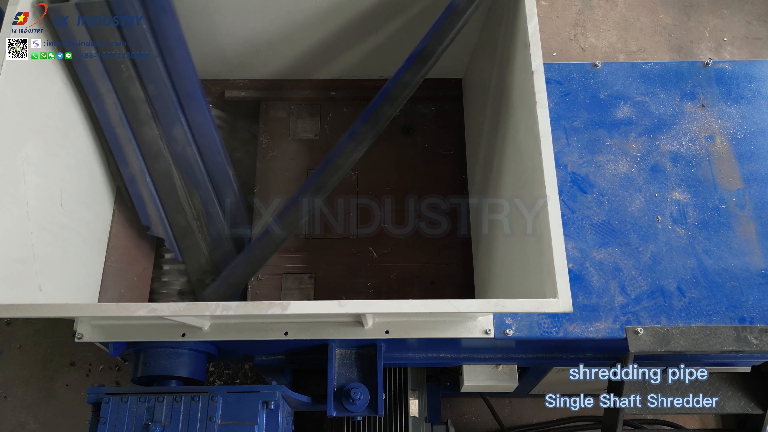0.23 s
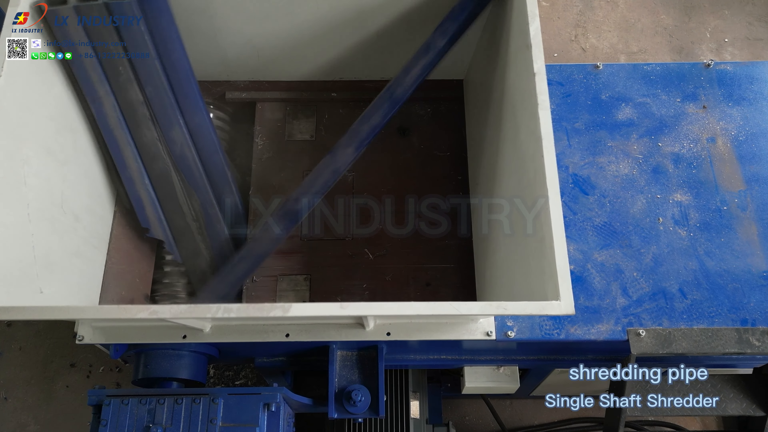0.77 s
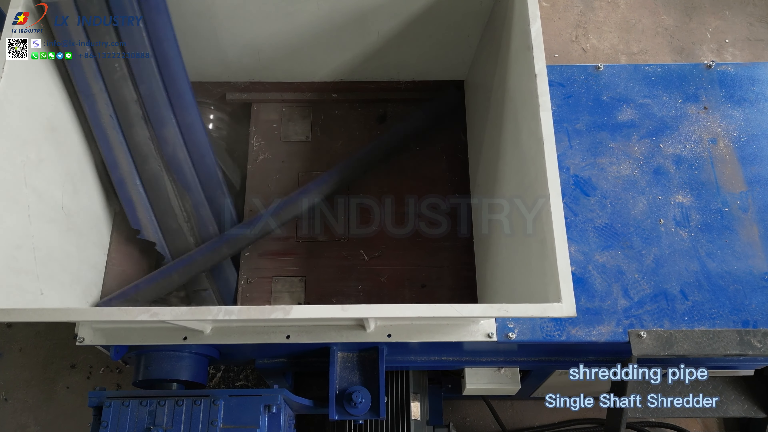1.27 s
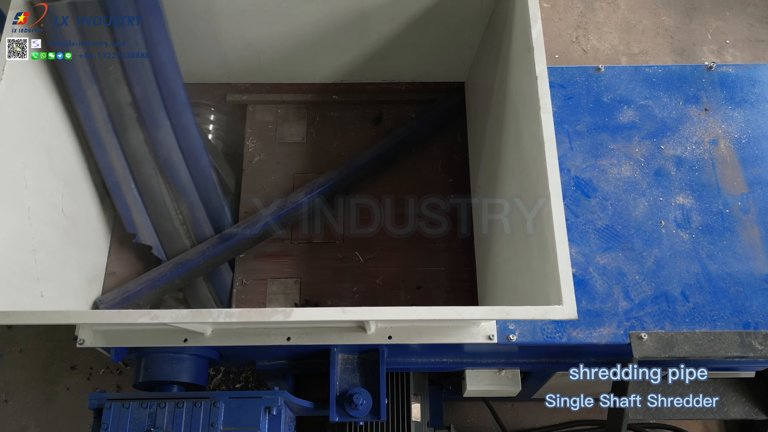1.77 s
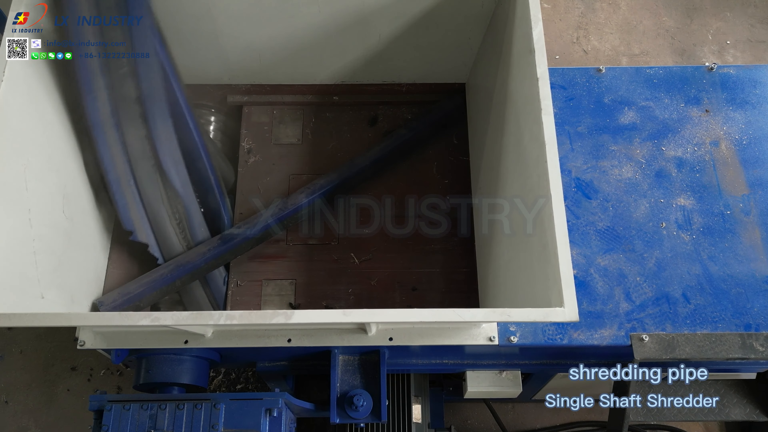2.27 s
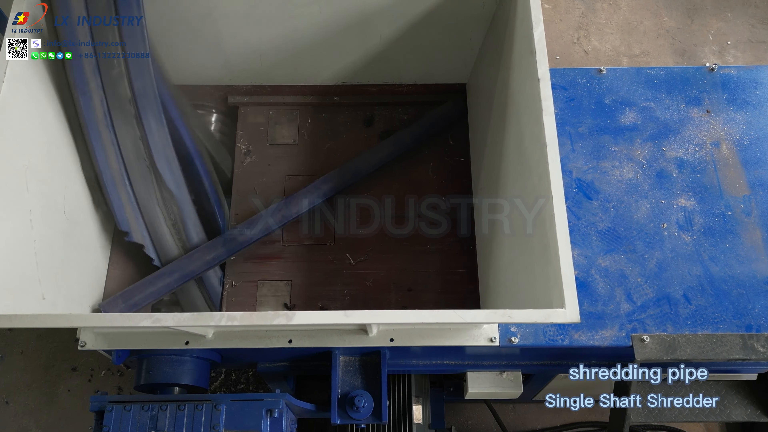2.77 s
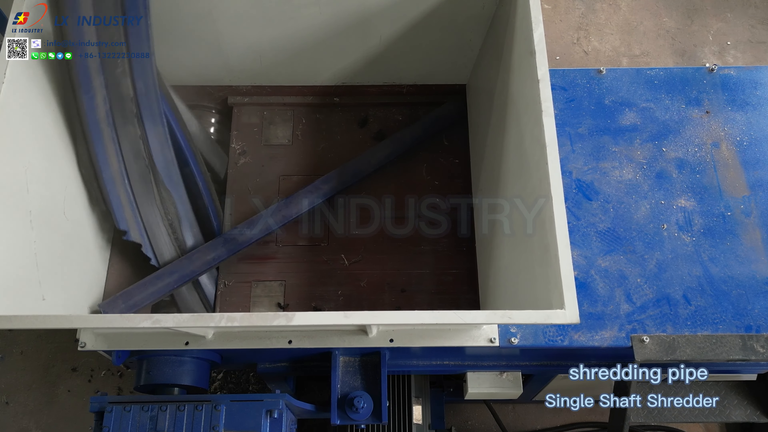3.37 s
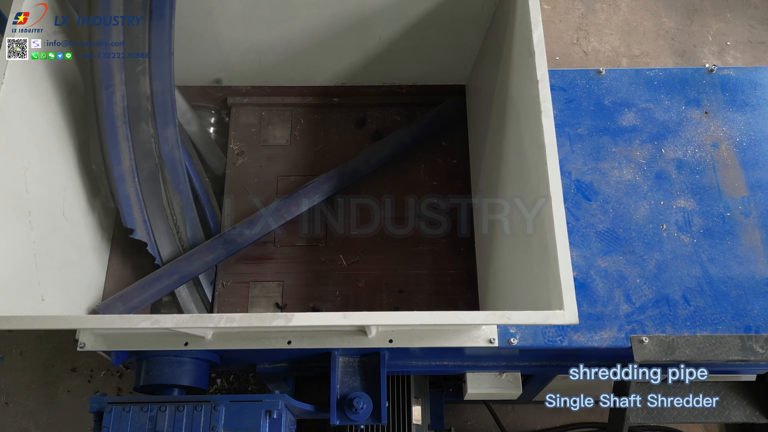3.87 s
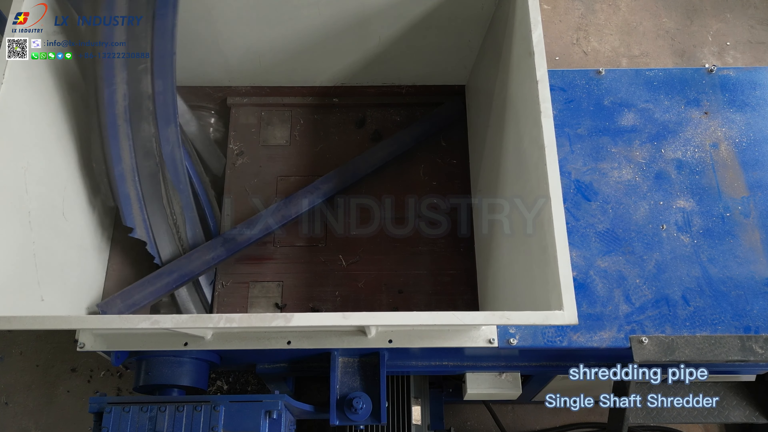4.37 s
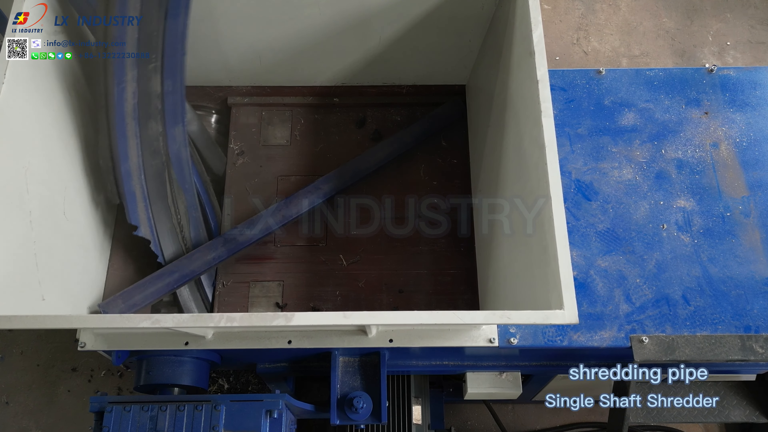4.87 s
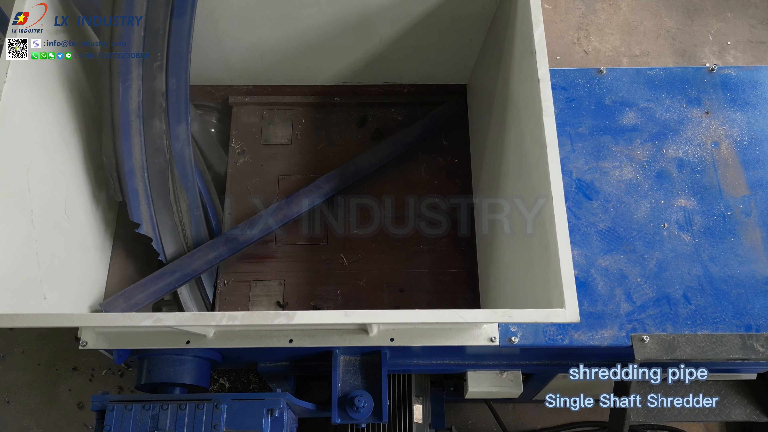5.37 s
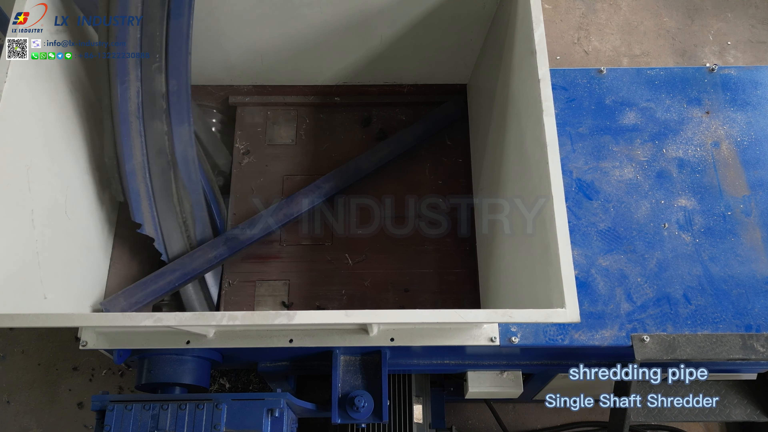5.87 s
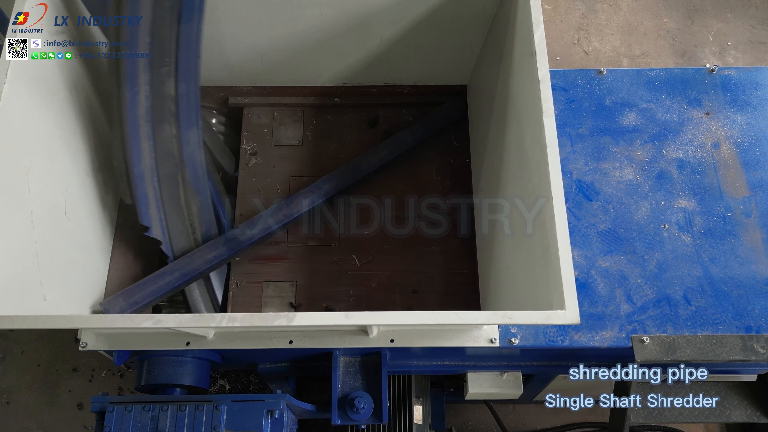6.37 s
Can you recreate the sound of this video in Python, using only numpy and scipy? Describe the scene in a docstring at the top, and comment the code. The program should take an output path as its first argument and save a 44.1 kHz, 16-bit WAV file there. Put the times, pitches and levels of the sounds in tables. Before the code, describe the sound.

Close above a steel hopper, a shredder bites plastic pipe almost six times a second, each bite a low thump with dense crunching, crackle and hollow snaps. The bending pipe groans raggedly, then honks on every bite. Around five seconds the cutting stops, leaving loose pieces knocking and ticking over a low drive hum, with a slight catch at the end.

```python
"""Shredder chewing plastic pipes

A single-shaft shredder in a steel hopper, heard from above. The knives bite almost six times a second:
each bite thumps the frame and crushes plastic, as shaped noise made of random fractures.
The bending pipe groans, then honks on every knife, as wavering sines; snapped lengths ring in bending modes.
Then the rotor runs nearly empty, loose pieces knock over the drive's hum, and the knives catch again."""
import sys
import numpy as np
from scipy import signal
from scipy.fft import rfft, irfft, next_fast_len
from scipy.io import wavfile
from scipy.ndimage import map_coordinates

SR = 44100
rng = np.random.default_rng(int(sys.argv[2]) if len(sys.argv) > 2 else 0)


def to_wav(sig):
    """Store sig (one row per channel, or 1-D mono) as 16-bit WAV at the path in sys.argv[1].

    Samples outside -1..1 are clipped; the rate is SR.
    """
    pcm = np.clip(np.atleast_2d(sig), -1, 1) * 32767
    pcm = np.round(pcm).astype(np.int16)
    wavfile.write(sys.argv[1], SR, pcm.T)  # frames by channels


N = 291501

# Levels in all tables are relative: the functions add trims.
# knives breaking into the pipe wall: (time [s], crunch level [dB], bright crackle level [dB])
BITES = [(.1, -26, -43), (.277, -21, -31), (.455, -21, -30), (.628, -16.5, -26), (.8, -19, -27),
         (.98, -20, -22.5), (1.163, -19.5, -22.5), (1.335, -20.5, -21.5), (1.5, -17, -29),
         (1.66, -18.5, -34), (1.82, -19.5, -31), (2.01, -19.5, -37), (2.2, -20, -27), (2.375, -16.5, -38),
         (2.555, -20, -29), (2.735, -18.5, -29), (2.92, -19, -36), (3.09, -20, -31), (3.254, -22, -32),
         (3.429, -19.5, -27), (3.6, -30, -28), (3.78, -29, -28), (3.955, -29, -31), (4.13, -28, -32),
         (4.305, -22.5, -30), (4.48, -23, -32), (4.665, -24.5, -24.5), (4.835, -21.5, -30)]


def amp(db):
    """Decibels to gain."""
    return 10 ** (np.asarray(db) / 20)


def unit(x):
    """Scale to rms 1."""
    return x / np.sqrt(np.mean(np.abs(x) ** 2) + 1e-20)


def clock():
    """Time of each sample [s]."""
    return np.arange(N) / SR


def along(points, hz):
    """Each column of (frequency [Hz], ...) points, interpolated on a log axis."""
    f, *cols = np.transpose(points)
    return [np.interp(np.log(hz + 1), np.log(f + 1), c) for c in cols]


def level(rows, at_s):
    """A (time [s], level [dB]) curve, read at the given moments."""
    return np.interp(at_s, *np.transpose(rows))


def wobble(rate_hz):
    """Smooth random curve with rate_hz knots a second."""
    knots = rng.standard_normal(int(N * rate_hz / SR) + 4)
    return map_coordinates(knots, [clock() * rate_hz], mode="nearest")


def phase_of(hz):
    """Phase [rad] of a tone that follows a frequency curve."""
    return 2 * np.pi * np.cumsum(hz) / SR


def filtered(x, response):
    """x times a complex response of frequency."""
    size = next_fast_len(N + SR // 4)
    spectrum = rfft(x, size) * response(np.fft.rfftfreq(size, 1 / SR))
    return irfft(spectrum, size)[..., :N]


def causal(gain):
    """Minimum-phase response with this gain: it rings only after its cause."""
    cepstrum = irfft(np.log(np.maximum(gain, 1e-6)))
    half = len(cepstrum) // 2
    return np.exp(rfft(np.r_[cepstrum[0], 2 * cepstrum[1:half]], len(cepstrum)))


def fractures(rate_hz, spread_db):
    """Tiny snaps at random moments, sizes spread by spread_db, in two rows that share the moments but draw
    their signs and sizes apart."""
    sizes = amp(spread_db * np.clip(rng.standard_normal(N), -2, 2))
    snapped = rng.random(N) < rate_hz / SR
    return unit(snapped * sizes * rng.standard_normal((2, N)))


def hopper(excitation, colour, ring_db):
    """Excitation coloured by hopper and pipe resonances and spread in stereo, at rms 1."""
    # hopper and pipe resonances: (centre [Hz], width [Hz], gain over the broad colour [dB])
    resonances = [(110, 8.5, -5), (139.3, 19, -8.5), (236, 31, -8.5), (454, 5.1, -20), (506, 2.8, -2),
                  (666, 180, -8), (910, 51, -9.5), (1063, 12, -7), (2526, 36, -13), (6320, 680, -6)]
    # stereo width, phase and balance by frequency, opposite in phase near 10 kHz:
    # (frequency [Hz], side minus mid [dB], left's lead [rad], left minus right [dB])
    stereo = [(60, -29, 0, 0), (150, -20, 0, 0), (380, -12.5, .1, -.7), (900, -9.5, .35, 1.3),
              (1600, -7, -.3, .7), (2300, -8.5, .15, -.2), (3100, -6.5, 1.2, -.3), (4500, -2, 1.3, 1),
              (5500, -1, 0, 3.5), (7200, -4, -.9, 1.8), (8500, -9, -2.2, .8), (10000, -14, -3.1, 0),
              (11500, -12, -5.3, 0), (12500, -15, -6.1, 0)]

    def body(hz):
        rings = 0
        for c, w, db in resonances:
            rings = rings + amp(db + ring_db) * 1j * hz * w / (c * c - hz * hz + 1j * hz * w)
        turn = np.arctan(amp(along(stereo, hz)[0]))
        split = np.array([np.cos(turn), np.sin(turn)])  # mid, side
        return causal(amp(along(colour, hz)[0])) * (1 + rings) * split

    def left_right(hz):
        _, lead_rad, balance_db = along(stereo, hz)
        left = amp(balance_db / 2) * np.exp(.5j * lead_rad)
        return np.array([left, 1 / left])

    mid, side = filtered(excitation, body)
    return unit(filtered(np.array([mid + side, mid - side]), left_right))


def swells(times_s, peaks_db, rise_s, fall_s):
    """Force envelope: each event builds and fades as a two-sided Gaussian in power; powers add."""
    power = np.zeros(N)
    for s, db in zip(times_s, peaks_db):
        span = slice(max(int((s - 5 * rise_s) * SR), 0), int((s + 5 * fall_s) * SR))
        t = np.arange(*span.indices(N)) / SR - s
        power[span] += amp(db) ** 2 * np.exp(-(t / np.where(t < 0, rise_s, fall_s)) ** 2)
    return np.sqrt(power)


def cutting(ping_db=-4):
    """Each bite shakes the frame, crushes pipe wall and sets off fine crackle; snags jolt more suddenly."""
    # how strongly a bite shakes the frame: (time [s], level [dB])
    thump_curve = [(.1, -20), (1.2, -24.5), (2.05, -13.5), (2.7, -15.5), (3.2, -34), (4.2, -36),
                   (4.83, -24)]
    # stray ends caught after the last regular bite: (time [s], frame thump level [dB], crunch level [dB])
    snag_rows = [(4.9, -40, -25), (4.975, -30, -27), (5.085, -29, -40), (6.505, -35, -32),
                 (6.555, -44, -38)]
    # colours of frame thump, breaking pipe, crackle: (frequency [Hz], gain [dB])
    frame_colour = [(20, -34), (40, -16), (56, 8.5), (78, 13.5), (95, -3), (140, 6.5), (260, -41.5)]
    crunch_colour = [(40, -46), (110, -11), (170, -4), (240, 1), (290, -2), (380, -2), (520, -3),
                     (750, -2.5), (1100, -3), (1900, -9), (2750, -14.5), (3700, -22), (8000, -33),
                     (15000, -45)]
    crackle_colour = [(400, -27), (1000, 2), (1500, 0), (2100, -4.5), (2650, 1.5), (3600, -8.5),
                      (6000, -18), (9000, -30), (15000, -47)]

    bites, crunch_db, crackle_db = np.transpose(BITES)
    snags, jolt_db, tear_db = np.transpose(snag_rows)
    shaking = np.hypot(swells(bites, level(thump_curve, bites) - 8, rise_s=0.087, fall_s=0.059),
                       swells(snags, jolt_db, rise_s=0.03, fall_s=0.045))
    breaking = np.hypot(swells(bites, crunch_db - 1.5, rise_s=0.042, fall_s=0.048),
                        swells(snags, tear_db, rise_s=0.084, fall_s=0.023))
    crackling = swells(bites, crackle_db - 2.5, rise_s=0.036, fall_s=0.037)

    thump = hopper(fractures(rate_hz=900, spread_db=0.0), frame_colour, ring_db=1)
    crushed = amp(1.3 * wobble(70)) * fractures(rate_hz=16000, spread_db=1.5)
    crunch = hopper(crushed, crunch_colour, ring_db=8.0)
    cracked = amp(3.0 * wobble(160)) * fractures(rate_hz=3500, spread_db=4.5)
    crackle = hopper(cracked, crackle_colour, ring_db=-3) + amp(ping_db) * splinters()
    return shaking * thump + breaking * crunch + crackling * crackle


def splinters(rate_hz=260, pitch_hz=1450, octaves=.7, cycles=32, spread_db=2):
    """Splinters spring free and ring, each at its own pitch and place, losing 20 dB in `cycles` cycles."""
    draws = rng.standard_normal((int(rate_hz * N / SR), 3))  # pitch, level, place
    t = np.arange(SR // 20) / SR
    hz = pitch_hz * 2 ** (octaves * np.clip(draws[:, :1], -1.3, 1.6))
    pings = np.sin(2 * np.pi * hz * t) * amp(spread_db * draws[:, 1:2] - 20 * hz * t / cycles)
    at = rng.integers(0, N, (len(draws), 1)) + np.arange(len(t))
    channels = []
    for side in (1, -1):
        panned = pings * amp(side * 2.6 * draws[:, 2:])
        channels.append(np.bincount(at.ravel(), panned.ravel(), N)[:N])
    return unit(np.array(channels))


def snaps(rise_s=0.0039, crack_t60_s=0.059):
    """Pipe wall snaps off or is struck: a crack, then a brief ring in bending modes."""
    # snapped lengths, the shorter the higher: (time [s], pitch [Hz], ring level [dB], crack level [dB])
    snap_rows = [(0.061, 244.5, -11, -20), (0.122, 236.4, -13, -15), (0.268, 382, -12, -14.5),
                 (0.398, 385, -14, -24), (0.436, 237, -13, -30), (0.593, 226, -11, -17),
                 (0.649, 390, -19, -22), (0.734, 407, -15, -26), (0.765, 236, -12, -21),
                 (0.82, 235, -16, -24), (1.158, 222, -12, -19), (1.336, 215, -19, -26),
                 (1.361, 374, -15, -19.5), (1.503, 246, -9, -25), (1.551, 356, -10, -26),
                 (1.738, 377, -13, -17), (1.865, 306, -13, -15), (2.021, 385, -12, -13),
                 (2.217, 222.4, -9.5, -34), (2.556, 221, -10.5, -33), (2.709, 242, -8, -20),
                 (3.104, 244.8, -11.5, -23), (5.08, 387, -25, -45), (5.11, 402, -26, -42),
                 (5.276, 476, -27.5, -36), (5.58, 388, -26, -44), (6.164, 370, -29, -48),
                 (6.463, 378, -20, -36)]
    # bending modes of a length: (multiple of pitch, level [dB], t60 [s])
    modes = [(1.001, 1, 0.11), (1.8, -20, 0.11), (2.95, -8, 0.1), (4.3, -25, 0.037)]
    colour = [(150, -18), (400, -3), (750, 4.5), (1100, -8), (1900, -14), (2800, -18), (4000, -13),
              (9000, -34), (15000, -67)]

    rings, cracks = np.zeros((2, N + SR))
    t = np.arange(SR // 5) / SR
    onset = 1 - np.exp(-t / rise_s)
    for s, hz, ring_db, crack_db in snap_rows:
        span = slice(round(s * SR), round(s * SR) + len(t))
        luck = rng.random((len(modes), 2))  # mode level, start phase
        ring = 0
        for (multiple, db, t60_s), (a, b) in zip(modes, luck):
            decay = amp(db + 3.4 * (a - 0.5) - 60 * t / t60_s)
            ring = ring + decay * np.sin(2 * np.pi * (multiple * hz * t + b))
        rings[span] += amp(ring_db + 0.5) * ring * onset
        cracks[span] += amp(crack_db + 6 - 60 * t / crack_t60_s) * onset
    crack = hopper(fractures(rate_hz=6500, spread_db=5.5), colour, ring_db=-18)
    return rings[:N] + cracks[:N] * crack


def groan(judder_db=-4.5):
    """The bending pipe sticks and slips raggedly on the knives: a wavering tone in a judder."""
    # sliding pitch of the strained pipe: (time [s], pitch [Hz], level [dB])
    slide = [(2.08, 370.4, -27), (2.185, 388.7, -21), (2.25, 347.7, -19.5), (2.3, 391.1, -25),
             (2.39, 345.6, -17.5), (2.455, 403.4, -17.5), (2.494, 372, -35), (2.535, 348.4, -16),
             (2.6, 351.3, -21), (2.63, 394.1, -21), (2.712, 390, -22), (2.75, 345.3, -29),
             (2.793, 381.8, -16.5), (2.83, 348.8, -20), (2.88, 372, -19), (2.92, 346, -23),
             (2.961, 396, -19), (3.0, 383.2, -34), (3.06, 373, -19), (3.16, 355, -23), (3.3, 366, -29)]
    tone_db, rough_db, jitter_hz = -1, 2.8, 8
    scrape = [(150, -39.0), (240, -13), (300, -12), (345, -0.5), (400, 3.5), (450, -10.5), (800, -22),
              (2000, -45)]

    def flutter():
        return amp(rough_db * wobble(110))

    times, hz, db = np.transpose(slide)
    phase = phase_of(np.interp(clock(), times, hz) + jitter_hz * wobble(70))
    tone = unit(flutter() * np.sin(phase) + amp(-21) * flutter() * np.sin(2 * phase))
    judder = hopper(fractures(rate_hz=900, spread_db=-0.5), scrape, ring_db=-15)
    strain = np.interp(clock(), times, amp(db), left=0, right=0)
    return strain * (amp(tone_db) * tone + amp(judder_db) * judder)


def honks(pitch_hz=367, bend_hz=11, under_hz=324, under_db=-9, tear_db=-9.0, give_s=0.012):
    """Each knife grips the bent pipe with a bright rising tone, swells to a honk, tears with a lower rasp."""
    # honk on each knife: (time [s], level [dB], overtone level [dB], lead of the grip [s])
    honk_rows = [(3.243, -13, -32, 0.0042), (3.421, -11.5, -18, .005), (3.606, -12, -22.5, .012),
                 (3.779, -12, -20.5, 0.02), (3.955, -13.5, -22, 0.03), (4.128, -14.5, -22, 0.02),
                 (4.31, -16.5, -25, 0.035), (4.481, -18.5, -22.5, 0.03), (4.654, -20, -23, 0.03),
                 (4.832, -18, -23, 0.037)]
    rough_db, jitter_hz = 1.8, 5
    torn = [(120, -30.5), (235, -1), (275, -15.5), (325, 1.5), (400, 2.5), (490, -6), (570, -22),
            (670, 2.5), (800, -17), (2000, -38.5)]

    def partial(phase):
        return unit(amp(rough_db * wobble(110)) * np.sin(phase))

    times, db, bright_db, lead_s = np.transpose(honk_rows)
    force = swells(times + give_s, np.zeros(len(times)), rise_s=.04, fall_s=0.01994)
    phase = phase_of(pitch_hz + bend_hz * force + jitter_hz * wobble(70))  # force bends the pitch up

    body = swells(times, db - 1.5, rise_s=0.028, fall_s=0.022)
    tail = swells(times, db - 10.5, rise_s=0.027, fall_s=0.097)
    honk = (body + tail) * partial(phase)
    gripping = swells(times - lead_s, bright_db - 2.0, rise_s=0.024, fall_s=0.025)
    grip = gripping * (partial(2 * phase) + amp(-7.5) * partial(3 * phase))

    tearing = swells(times + give_s, db - 1, rise_s=0.039, fall_s=0.021)
    under = amp(under_db) * partial(phase_of(under_hz + 12 * wobble(40)))
    tear = amp(tear_db) * hopper(fractures(rate_hz=3000, spread_db=-4), torn, ring_db=-11)
    return (honk + grip) * amp([[-.7], [.7]]) + tearing * (under + tear)


def rasp(ping_db=-12):
    """Pipe and scraps drag over the turning rotor and shed splinters, louder with the load."""
    # how hard plastic presses on the rotor: (time [s], level [dB])
    load = [(0.0, -21.5), (0.35, -21.5), (0.83, -22), (1.1, -22.5), (1.24, -22), (1.36, -20.5), (1.99, -19),
            (2.39, -20), (2.78, -18.5), (4.82, -24.5), (5.01, -29), (5.17, -36.5), (5.56, -41.5),
            (6.09, -46.5), (6.28, -42.5), (6.61, -33)]
    # colour of the rubbing: (frequency [Hz], gain [dB])
    rub_colour = [(22, -30), (45, -13.5), (70, 3), (105, -8), (170, -4.5), (240, -2), (300, -1), (430, -1),
                  (600, -9), (1080, -5.5), (1900, -12.5), (2650, -17), (3800, -25), (15000, -53.5)]
    rubbed = fractures(rate_hz=10000, spread_db=1.0)
    rubbing = amp(0.63 * wobble(25.21)) * hopper(rubbed, rub_colour, ring_db=3.0)
    shed = amp(ping_db) * splinters(rate_hz=320, pitch_hz=1252)
    return amp(level(load, clock()) + 3.0) * (rubbing + shed)


def chips(lead_s=0.015, bite_db=-3, stray_db=0):
    """Chips crackle on screen and walls: showers at each bite, spills onto the empty rotor, single ticks."""
    # fine chips in flight: (time [s], level [dB])
    flight = [(0.0, -33), (1.25, -31), (1.47, -29.5), (1.84, -30.5), (2.24, -31.5), (2.69, -32),
              (4.08, -37.5), (4.82, -37), (5.21, -47.5), (5.72, -54), (6.11, -55), (6.26, -50), (6.61, -44)]
    # chips spilling back onto the empty rotor: (time [s], level [dB])
    spill_rows = [(5.06, -41), (5.135, -43), (5.435, -45), (5.475, -52), (5.6, -47), (5.645, -45),
                  (5.825, -43), (5.875, -47), (6.01, -47), (6.175, -51), (6.51, -42)]
    # single splinters ticking on steel: (time [s], level [dB])
    tick_rows = [(5.243, -42), (5.28, -51), (5.52, -44), (5.985, -50), (6.068, -43), (6.16, -45),
                 (6.351, -33.5)]
    # broad treble colour of the spray, with a narrow gap near 10 kHz: (frequency [Hz], gain [dB])
    spray_colour = [(800, -54), (2500, 5.5), (4000, -1.5), (5200, 1.5), (6500, -7.5), (8400, -2.5),
                    (9300, -3.5), (10100, -57), (11100, -7.5), (12200, -14), (14000, -13.5), (15600, -26)]

    bites = np.transpose(BITES)[0]
    thrown = swells(bites - lead_s, np.full(len(bites), bite_db), rise_s=0.059, fall_s=0.028)
    showers = amp(level(flight, clock()) + 4) * np.hypot(amp(stray_db), thrown)
    spills = swells(*np.transpose(spill_rows), rise_s=0.02, fall_s=0.028)
    ticks = swells(*np.transpose(tick_rows), rise_s=0.004, fall_s=0.0072)
    amount = np.sqrt(showers ** 2 + spills ** 2 + ticks ** 2)
    spray = hopper(fractures(rate_hz=22000, spread_db=0.0), spray_colour, ring_db=5.0)
    return amount * amp(0.79 * wobble(50)) * spray


def knocks(rise_s=0.0065):
    """Loose pieces are flung at the walls: noise bursts with a soft onset and exponential decay."""
    # loose pieces hitting the hopper: (time [s], level [dB], t60 [s])
    pieces = [(4.976, -21.5, 0.16), (5.128, -30.5, 0.28), (5.181, -29, .08), (5.257, -32, 0.071),
              (5.277, -27, 0.058), (5.337, -35, .07), (5.399, -32, .25), (5.574, -32, 0.24),
              (5.619, -27, 0.11), (5.65, -31, .07), (5.699, -39, .06), (5.774, -31, 0.086),
              (5.82, -35, 0.24), (5.984, -33, 0.16), (6.06, -32, 0.077), (6.158, -29.5, 0.14),
              (6.245, -36, .06), (6.318, -30, .09), (6.345, -31, 0.19), (6.388, -32, 0.11),
              (6.42, -33, 0.11), (6.446, -31, 0.28), (6.471, -30, 0.24), (6.515, -30, 0.16)]
    colour = [(40, -38), (80, 12), (170, -26), (300, 0), (410, 10.5), (650, -10.5), (800, -2.0),
              (1060, 4.5), (1900, -4.5), (2700, -10.0), (4200, -13.5), (9000, -34), (15000, -48)]
    hits = np.zeros(N)
    for s, db, t60_s in pieces:
        age = np.maximum(clock() - s + rise_s, 0)
        hits += amp(db - 60 * age / t60_s) * (1 - np.exp(-(age / rise_s) ** 2))
    return amp(2.5) * hits * hopper(fractures(rate_hz=3600, spread_db=4.5), colour, ring_db=-14)


def rattle(ping_db=-7):
    """Small offcuts keep tumbling on the rotor in little flurries, tick against the steel and ring."""
    colour = [(200, -44), (450, 17), (1100, 4), (1900, 7), (2700, -5), (4200, -7), (9000, -5.5),
              (15000, -64)]
    ticks = fractures(rate_hz=260, spread_db=0.5)
    t = np.arange(SR // 20) / SR
    ring = rng.standard_normal(len(t)) * amp(-60 * t / 0.03) * (1 - np.exp(-t / 0.0008))
    ringing = signal.fftconvolve(ticks, ring[None], axes=1)[:, :N]
    tumbling = hopper(ringing, colour, ring_db=-18)
    pings = splinters(rate_hz=70, pitch_hz=1386, cycles=15, spread_db=1.5)
    return amp(-45.5 + 1.8 * wobble(22)) * (tumbling + amp(ping_db) * pings)


def squeaks():
    """An edge of plastic slides on steel and sings for a moment: a short sine of unsteady pitch."""
    # plastic on steel: (time [s], pitch [Hz], level [dB], half length [s])
    slides = [(2.764, 745, -19, 0.02), (3.255, 904, -21, 0.069), (5.276, 1530, -38, .012),
              (5.415, 2700, -43, 0.011), (5.582, 3300, -44, .007), (5.623, 1044, -33.5, 0.011),
              (6.26, 3250, -40, 0.0057), (6.494, 1037, -30.5, .03)]
    total = np.zeros(N)
    for s, hz, db, length_s in slides:
        tone = np.sin(phase_of(hz * (1 + 0.00905 * wobble(150))))
        total += swells([s], [db], rise_s=length_s, fall_s=length_s) * tone
    return total


def walls(x, wet_db, t60_s, above_hz, shift_hz=6, count=6):
    """Treble bounces between steel walls, smearing each snap; the paths shift as the pipes move."""
    t = np.arange(SR // 6) / SR
    shares = np.array([wobble(shift_hz) for _ in range(count)])
    echo = np.zeros((2, N))
    for share in shares / np.linalg.norm(shares, axis=0):
        tail = rng.standard_normal((2, len(t))) * amp(-60 * t / t60_s) * (t > .003)
        tail = tail / np.linalg.norm(tail[0])
        echo += signal.oaconvolve(x * share, tail, axes=1)[:, :N]
    return amp(wet_db) * filtered(echo, lambda hz: (hz / np.hypot(hz, above_hz)) ** 2)


def drive():
    """Motor and gearbox: hum of sines with unsteady level and phase, over a noise rumble."""
    # drive and gearbox tones: (frequency [Hz], level [dB])
    hum = [(80.7, -53), (227, -52), (398, -51.5), (473.7, -50), (537, -50), (1082, -58), (1190, -61)]
    # colour of the running drive: (frequency [Hz], gain [dB])
    drone_colour = [(20, -29), (40, -8), (68, 3), (110, -11), (180, -8), (300, -13.5), (420, -4),
                    (600, -14), (1200, -39), (3000, -47), (8000, -56), (15000, -72)]
    tones = np.zeros(N)
    for hz, db in hum:
        unsteady = amp(db + 2.0 + 2.6 * wobble(13))
        tones += unsteady * np.sin(2 * np.pi * hz * clock() + 0.84 * wobble(22))
    rumble = hopper(fractures(rate_hz=9000, spread_db=6), drone_colour, ring_db=15)
    return tones + amp(-40.5) * rumble


def scene():
    """Plastic on the knives, its echo off the walls, and the drive."""
    worked = cutting() + snaps() + groan() + honks() + rasp()
    loose = chips() + knocks() + rattle() + squeaks()
    plastic = amp(-0.96) * (worked + loose)
    return plastic + walls(plastic, wet_db=-8, t60_s=0.075, above_hz=470) + drive()


def record(dry):
    """The camera thins the deepest rumble, rounds the highest peaks and cuts above its band limit."""
    ceiling, knee, top_hz = .92, 10, 15600  # ceiling: full scale = 1; a higher knee is firmer
    lean = filtered(dry, lambda hz: hz ** 4 / np.hypot(hz ** 4, 33 ** 4))
    rounded = lean / (1 + np.abs(lean / ceiling) ** knee) ** (1 / knee)
    return filtered(rounded, lambda hz: hz < top_hz)


dry = scene()
out = record(dry)
to_wav(out)
```